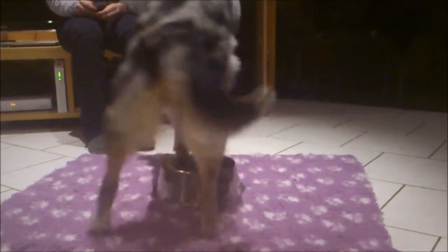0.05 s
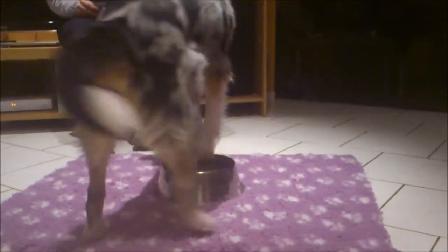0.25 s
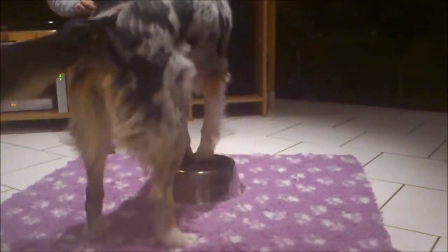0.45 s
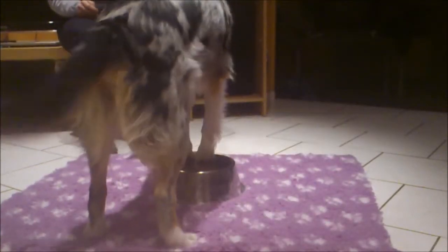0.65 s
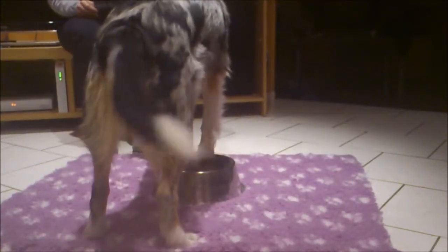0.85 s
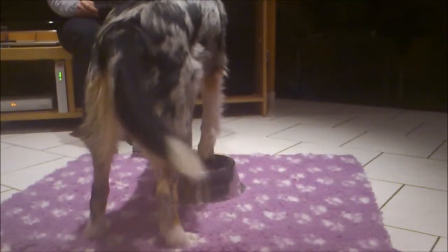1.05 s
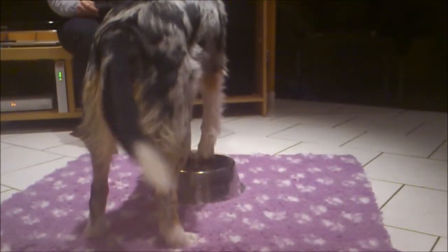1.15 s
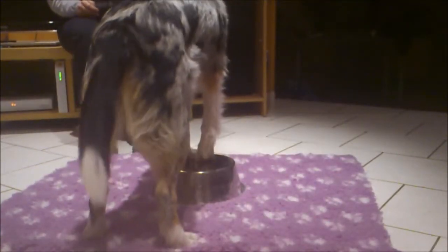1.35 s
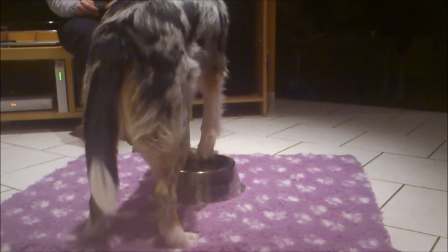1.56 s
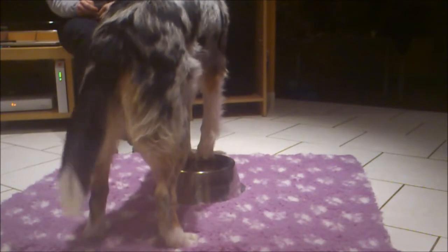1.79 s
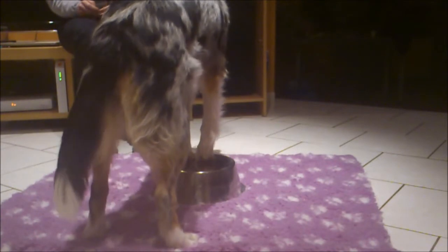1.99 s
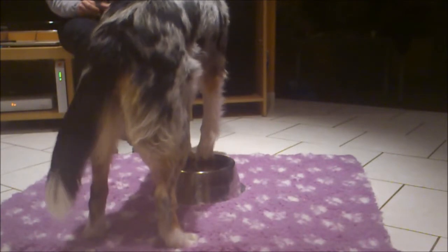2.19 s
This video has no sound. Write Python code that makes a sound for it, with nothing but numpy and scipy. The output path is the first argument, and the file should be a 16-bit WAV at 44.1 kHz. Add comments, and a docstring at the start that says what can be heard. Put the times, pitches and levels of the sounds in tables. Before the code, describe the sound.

A training clicker makes two loud, bright metallic snaps close by at about 0.23 and 0.44 seconds, slightly distorted, with a short tiled-room echo. Tiny claw ticks on a steel bowl precede them near 0.07. A dull step on a rug comes at 0.58, then quiet bowl nudges and claw ticks until 2.1, with faint fur rustle around 0.7-1.5, over low rumble and hiss.

```python
"""Quiet rumble and hiss come first, then claws tick on a steel bowl under a dog's front paws in a tiled room. A
clicker close by is pressed and let go: its steel tongue snaps twice, each time with its own resonances. Hind
feet shift dully on the rug, pads nudge the bowl, and the coat rustles as the tail wags. Each contact is a
minimum-phase modal ring convolved with a bright room response; the fur and floor are filtered noise. The
loudest peaks of the snaps saturate."""
import sys
import numpy as np
from scipy import signal
from scipy.fft import rfft, irfft, next_fast_len
from scipy.io import wavfile

SR = 44100
rng = np.random.default_rng(int(sys.argv[2]) if len(sys.argv) > 2 else 0)


def output_pcm(signal):
    """Save a mono or channel-first signal as 16-bit PCM at the path in sys.argv[1].

    Samples are clipped to [-1, 1] before scaling.
    """
    pcm = np.clip(np.atleast_2d(signal).T, -1, 1) * 32767
    wavfile.write(sys.argv[1], SR, np.round(pcm).astype(np.int16))


N = 97020  # samples, 2.2 s


def amp(db):
    """Logarithmic level: decibels to amplitude gain."""
    return 10 ** (np.asarray(db) / 20)


def along(points, hz):
    """Log-frequency interpolation between (f/Hz, value) points."""
    f, value = np.transpose(points)
    return np.interp(np.log(hz + 1), np.log(f + 1), value)


def filtered(x, response):
    """Linear filtering: the spectrum of x times a response of frequency."""
    n = x.shape[-1]
    padded = next_fast_len(n + 8192)  # room for the filter to ring out
    hz = np.fft.rfftfreq(padded, 1 / SR)
    return irfft(rfft(x, padded) * response(hz), padded)[..., :n]


def stereo_noise(alike, size):
    """Partial coherence: mid and side noise mixed to the left-right correlation of (f/Hz, likeness) points."""
    def mid_side_gains(hz):
        angle = np.arccos(np.clip(along(alike, hz), -1, 1)) / 2
        return np.array([np.cos(angle), np.sin(angle)])

    mid, side = filtered(rng.standard_normal((2, size)), mid_side_gains)
    return np.array([mid + side, mid - side])


# spectrum of the room rumble and microphone hiss: f/Hz, relative spectral level/dB
FLOOR_SPECTRUM = [(15, -32), (25, -4.5), (82, 0), (445, -7), (648, -7.5), (1050, -9.5), (1140, -10),
                  (1570, -8.5), (2170, -13.5), (3720, -16), (4620, -17), (7500, -18), (10100, -15.5),
                  (11800, -18.5), (15500, -22)]
FLOOR_DB, FLOOR_ALIKE = -62, 0.13  # RMS level/dB, left-right correlation


def floor():
    """Stationary coloured noise: quiet room rumble and microphone hiss."""
    noise = filtered(stereo_noise([(1, FLOOR_ALIKE)], N), lambda hz: amp(along(FLOOR_SPECTRUM, hz)))
    return amp(FLOOR_DB) * noise / noise.std()


# rustle of the coat while the tail wags, then settling: t/s, level/dB
COAT_LEVEL = [(0, -87.5), (0.7, -66.5), (0.9, -66.5), (1.2, -71), (1.45, -72.5), (1.7, -80)]
# spectrum of moving fur: f/Hz, relative spectral level/dB
FUR_SPECTRUM = [(500, -25.5), (2000, -4.5), (6000, 0.5), (10000, 0.5), (15000, -8)]


def coat():
    """Friction noise: moving fur as shaped noise under a slow level envelope."""
    noise = filtered(stereo_noise(ROOM_ALIKE, N), lambda hz: amp(along(FUR_SPECTRUM, hz)))
    level_db = np.interp(np.arange(N) / SR, *np.transpose(COAT_LEVEL))
    return amp(level_db) * noise / noise.std()


SKIRT = 1.3  # steepness of the flanks of a resonance


def ring(modes, low_hz, tilt_db=0, order=10, size=8192):
    """Modal synthesis: summed resonance powers, weak radiation below low_hz, made causal as minimum phase."""
    hz = np.fft.rfftfreq(size, 1 / SR) + 1
    power = 0
    for f, width, db in modes:
        detuning = 2 * (hz - f) / width
        power = power + amp(db) ** 2 / (1 + detuning ** 2 / SKIRT) ** SKIRT
    octaves = np.log2(np.maximum(hz, 1000) / 5000)  # tilt pivots at 5 kHz, constant below 1 kHz
    gain = np.sqrt(power / (1 + (low_hz / hz) ** order)) * amp(tilt_db * octaves)
    # folding the cepstrum onto positive times gives minimum phase
    cepstrum = irfft(np.log(gain + 1e-4))
    fold = np.r_[1, np.full(size // 2 - 1, 2), np.zeros(size // 2)]
    return irfft(np.exp(rfft(cepstrum * fold)))


# left-right correlation of the sound in the room: f/Hz, likeness/1
ROOM_ALIKE = [(200, .15), (1200, .15), (2100, -.3), (3400, 0.32), (4100, 0.17), (4800, .55), (6200, 0.028),
              (7400, .7), (8200, 1), (11000, .15), (13500, .4)]
# first reflections off floor, walls and furniture: delay t/s, level/dB
ECHOES = [(0.0032, -6.5), (0.0069, 4), (0.0083, -4.5), (0.012, 3.5), (0.0148, -2.5), (0.0218, -5),
          (0.0316, -8.5)]
# reverberation time of the tiled room: f/Hz, T60/s
ROOM_T60 = [(200, .4), (900, .52), (1700, .55), (3400, .55), (6000, .41), (10000, .31), (15000, .28)]
SCATTER_S = 0.0008  # decay constant of the smear of each reflection
TAIL_DB, TAIL_RISE_S = 5.0, 0.007  # long tail; the rise time also builds up the near scatter
NEAR_DB, NEAR_T60_S = 7.5, 0.2  # quickly dying scatter of nearby furniture
CHATTER_DB, CHATTER_S = 4.5, 0.0016  # direct sound: level, decay constant of the contact chatter


def unit(x):
    """Energy normalisation: the squared samples sum to two."""
    return x / np.sqrt(np.sum(x ** 2) / 2)


def room():
    """Reverberation: a random impulse response of direct chatter, early reflections, near scatter and tail."""
    size = SR * 3 // 4
    t = np.arange(size) / SR
    rise = 1 - np.exp(-(t / TAIL_RISE_S) ** 2)

    # each frequency band of the tail decays at its own rate
    hz, when, bands = signal.stft(stereo_noise(ROOM_ALIKE, size), SR, nperseg=256)
    fade = np.exp(-np.log(1000) * when / along(ROOM_T60, hz)[:, None])
    tail = signal.istft(bands * fade, SR)[1][:, :size]

    near = stereo_noise(ROOM_ALIKE, size) * np.exp(-np.log(1000) * t / NEAR_T60_S)

    bursts = 0
    for delay, db in ECHOES:
        smear = (t >= delay) * np.exp(-np.abs(t - delay) / SCATTER_S)
        bursts = bursts + amp(db) * unit(smear) / np.sqrt(2)
    reflections = bursts * stereo_noise(ROOM_ALIKE, size)

    chatter = unit(stereo_noise(ROOM_ALIKE, size) * np.exp(-t / CHATTER_S))
    late = amp(TAIL_DB) * unit(tail * rise) + amp(NEAR_DB) * unit(near * rise)
    return late + reflections + amp(CHATTER_DB) * chatter


def strike(start_s, db, body):
    """Convolution: a body's ring passed through a newly drawn room response."""
    sound = amp(db) * signal.fftconvolve(body[None], room(), axes=1)
    return np.pad(sound, ((0, 0), (round(start_s * SR), N)))[:, :N]


# claw ticks on the bowl: t/s, level/dB, tilt/(dB per octave)
CLAW_TICKS = [(0.067, -29, -0.5), (0.074, -28, -5.5), (0.7731, -23.5, -4.5), (1.0554, -34, 2),
              (1.13, -37, 3.5), (1.652, -42.5, 8), (1.7303, -35, -3.5), (2.0224, -39.5, 6),
              (2.0924, -35.5, -7.5)]
# resonances of the steel under a claw: f/Hz, width/Hz, level/dB
CLAW_MODES = [(1580, 500, -9), (3500, 150, -9.5), (4350, 280, -4.5), (6370, 1300, -6), (9700, 1300, -1),
              (11200, 1700, -7)]


def claws():
    """Hard-contact excitation: claws sound the high modes of the steel, with a spectral tilt for each tick."""
    return sum(strike(t, db, ring(CLAW_MODES, 900, tilt)) for t, db, tilt in CLAW_TICKS)


# knock of the button on the tongue just before it snaps: t/s, level/dB
BUTTON_KNOCKS = [(0.1790, -9.5)]
# resonances of the knocked button: f/Hz, width/Hz, level/dB
BUTTON_MODES = [(270.5, 110, -4), (1650, 400, -6.5), (3220, 330, -10), (4060, 320, 2.5), (4520, 210, -6.5),
                (5850, 710, -8), (7170, 700, -3.5), (8500, 630, -6.5), (9900, 800, 3.5), (11100, 770, -1.5),
                (14540, 680, -11)]
# resonances of the tongue bent down: f/Hz, width/Hz, level/dB
PRESS_MODES = [(1150, 300, -19), (1620, 280, -0.5), (2000, 450, -8), (3050, 400, -5), (3450, 160, -4.5),
               (4500, 300, -10.5), (5220, 340, 0), (5680, 860, 0.5), (6250, 400, -3.5), (8900, 600, 3.5),
               (9750, 600, 0), (10650, 750, 7), (12400, 1200, -8), (14700, 1100, -7.5)]
# resonances of the tongue sprung back: f/Hz, width/Hz, level/dB
RELEASE_MODES = [(1300, 360, -11.5), (1720, 300, -1), (2200, 400, -9.5), (3220, 230, 3.5), (3520, 260, 1.5),
                 (4050, 400, -2.5), (5900, 450, -1), (6680, 450, -3), (7600, 400, -7), (8700, 400, -11),
                 (9850, 520, 8), (11500, 320, 0), (12700, 1400, -4), (15860, 450, -9.5)]
PRESS_S, PRESS_DB = 0.2297, 17.5
RELEASE_S, RELEASE_DB = 0.4394, 18.9


def clicker():
    """Snap-through buckling: the button meets the tongue, which snaps down, then springs back."""
    button = ring(BUTTON_MODES, 203)
    # the small case radiates little below these low limits
    bent = ring(PRESS_MODES, 1510, order=18)
    sprung = ring(RELEASE_MODES, 1261, order=12)
    knocks = sum(strike(t, db, button) for t, db in BUTTON_KNOCKS)
    return knocks + strike(PRESS_S, PRESS_DB, bent) + strike(RELEASE_S, RELEASE_DB, sprung)


# dull steps of the hind feet on the rug: t/s, level/dB
RUG_STEPS = [(0.576, -15.5), (1.18, -25.5)]
# resonances of the rug under a foot: f/Hz, width/Hz, level/dB
RUG_MODES = [(107.9, 78, -21.5), (300, 64, -1.5), (487.6, 280, -10)]


def hind_feet():
    """Soft impact: shifting feet excite only low resonances of the rug."""
    rug = ring(RUG_MODES, 71)
    return sum(strike(t, db, rug) for t, db in RUG_STEPS)


# soft nudges of the pads on the bowl: t/s, level/dB
PAD_NUDGES = [(0.72, -22.5), (1.05, -33), (1.135, -29), (1.215, -27.5), (1.245, -27), (1.423, -22),
              (1.45, -28)]
# low, damped resonances of the bowl: f/Hz, width/Hz, level/dB
BOWL_MODES = [(590, 210, -1.5), (721.5, 21, 9.5), (850, 64, -2.5), (1190, 240, -6.5), (2160, 1200, -14)]


def pads():
    """Soft-contact excitation: pads sound only the low, damped modes of the bowl."""
    bowl = ring(BOWL_MODES, 251)
    return sum(strike(t, db, bowl) for t, db in PAD_NUDGES)


# response of the right microphone against the left: f/Hz, level/dB
RIGHT_MIC = [(300, -3), (1100, 0), (1750, -8), (2700, 0), (4100, 1.5), (5300, 1), (6500, 0), (7500, -4.5),
             (8600, -13.5), (9900, -18), (11500, -15.5), (13500, -10), (15300, -1.5)]


def scene():
    """Superposition: all sources add, with less treble at the right microphone, over the noise floor."""
    left, right = coat() + claws() + clicker() + hind_feet() + pads()
    right = filtered(right, lambda hz: amp(along(RIGHT_MIC, hz)))
    return np.array([left, right]) + floor()


CLIP_TOP, CLIP_HARDNESS = 0.71, 14.0  # saturation amplitude, sharpness of the knee
TOP_HZ = 15800  # upper band limit


def record(dry):
    clipped = dry / (1 + np.abs(dry / CLIP_TOP) ** CLIP_HARDNESS) ** (1 / CLIP_HARDNESS)
    lowpass = signal.firwin(201, TOP_HZ, fs=SR)
    return signal.fftconvolve(clipped, lowpass[None], 'same', axes=1)


dry = scene()
out = record(dry)
output_pcm(out)
```